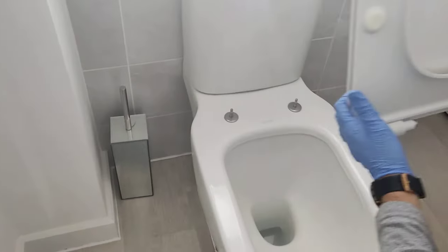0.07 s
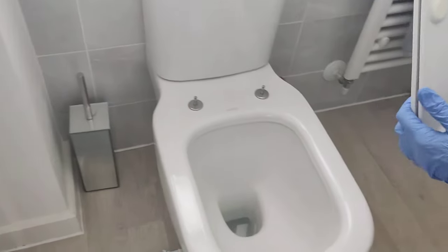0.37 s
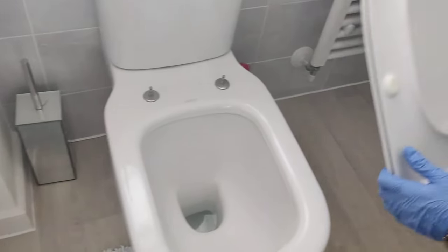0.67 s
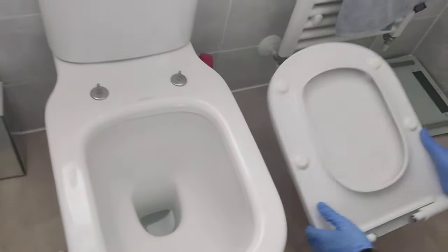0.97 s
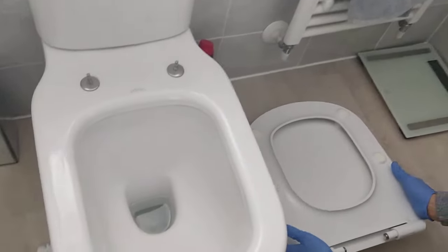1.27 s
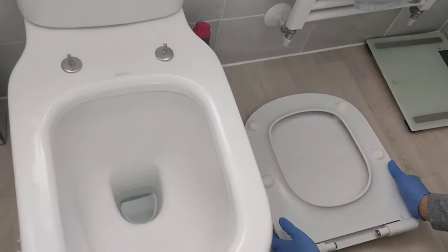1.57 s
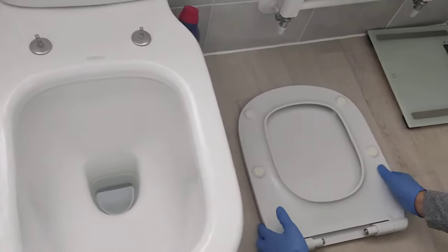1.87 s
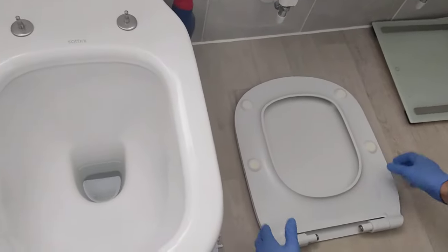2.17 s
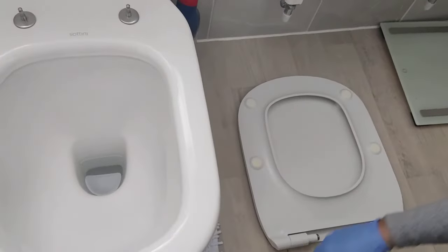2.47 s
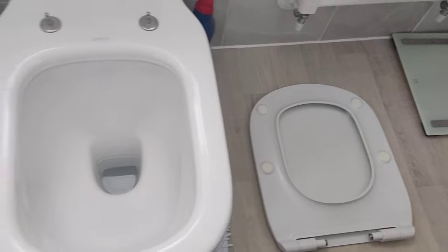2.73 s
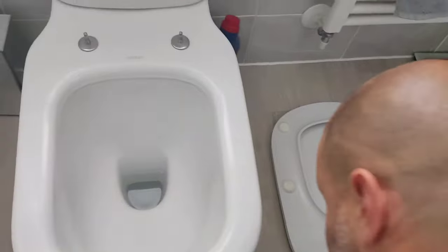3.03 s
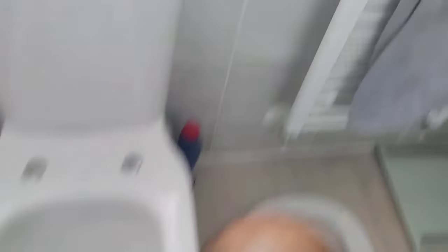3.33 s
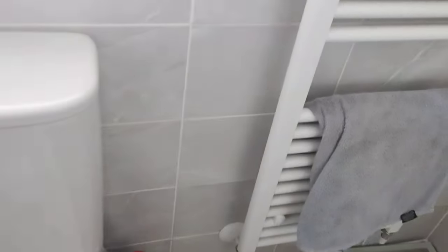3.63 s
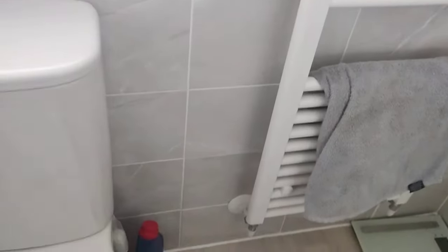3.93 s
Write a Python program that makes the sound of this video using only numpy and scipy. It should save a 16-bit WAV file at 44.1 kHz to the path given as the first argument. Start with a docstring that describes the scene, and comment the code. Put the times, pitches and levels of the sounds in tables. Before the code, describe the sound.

A plastic toilet seat is set down in a small tiled bathroom. Faint scuffs and sleeve rustle come first, with a low bump near 0.9 seconds. One edge knocks on the floor at 1.7; the rest clatters down at 2.1 and rocks lightly. Cloth swishes at 2.6. Around 3.4 seconds, something hard and hollow gives three loud, rapid clacks close by, then scrapes softly until about 3.9.

```python
"""Plastic seat on a tiled floor

A toilet seat is carried across a small bathroom amid rustling sleeves and handling noise. One edge
lands, then the rest clatters down and rocks. Something hard and hollow then clacks three times close by
and scrapes briefly. Each impact is a direct burst followed by reflections from the tiles; the struck
bodies ring in damped normal modes, and friction is amplitude-modulated noise."""
import sys
import numpy as np
from scipy import signal
from scipy.fft import rfft, irfft, next_fast_len
from scipy.io import wavfile
from scipy.ndimage import map_coordinates

SR = 44100
rng = np.random.default_rng(int(sys.argv[2]) if len(sys.argv) > 2 else 0)


def file_out(sig):
    """Save sig as 16-bit WAV at sys.argv[1]."""
    # one column per channel
    cols = np.atleast_2d(sig).T
    # limit, then scale
    lim = np.clip(cols, -1, 1)
    pcm = np.round(lim * 32767).astype(np.int16)
    wavfile.write(sys.argv[1], SR, pcm)


N = 176400
RING_N = SR * 3 // 4  # samples in the response to one impact

# likeness of the sound at the two microphone ports (frequency [Hz], correlation [-1 to 1])
PORT_CORRELATION = [(30, .8), (150, .96), (350, .82), (700, .45), (1400, -.1), (3000, 0)]
# spectrum of a dull thud (frequency [Hz], level [dB])
THUD_SPECTRUM = [(40, -44.5), (90, -21), (140, 2.5), (200, -3.5), (350, -7), (480, -13.5), (1500, -17.5),
                 (5000, -73)]
# spectrum of a sharp crack (frequency [Hz], level [dB])
CRACK_SPECTRUM = [(200, -13), (700, -22.5), (1750, -9), (2700, 0), (4500, -3), (5600, 1.5), (7500, 2),
                  (9000, 4), (11000, 2.5), (13000, -4.5), (14500, -25)]


def amp(db):
    """Amplitude ratio of a level in decibels."""
    return 10 ** (np.asarray(db) / 20)


def unit(x):
    """Normalisation to an rms of 1."""
    return x / np.sqrt(np.mean(x ** 2) + 1e-20)


def along(points, hz):
    """Interpolation of (frequency [Hz], value) points on a logarithmic frequency axis."""
    frequencies, values = np.transpose(points)
    return np.interp(np.log(hz + 1), np.log(frequencies + 1), values)


def add(track, s, sound):
    """Superposition of a sound on a track from time s."""
    part = track[:, round(s * SR):][:, :sound.shape[-1]]
    part += sound[..., :part.shape[-1]]


def wobble(rate):
    """Band-limited fluctuation: a spline through `rate` random knots a second."""
    knots = rng.standard_normal(int(N * rate / SR) + 4)
    return map_coordinates(knots, [np.arange(N) * rate / SR])


def swells(strokes):
    """Incoherent strokes (peak time [s], rise [s], fall [s], level [dB]) add in power to one envelope."""
    t = np.arange(N) / SR
    return np.sqrt(sum(amp(db) ** 2 * np.exp(-((t - s) / np.where(t < s, rise, fall)) ** 2)
                       for s, rise, fall, db in strokes))


def minimum_phase(gain, size):
    """Causality: folding the cepstrum onto positive time gives a gain curve its minimum phase."""
    cepstrum = irfft(np.log(gain), size)
    cepstrum[1:size // 2] *= 2
    cepstrum[size // 2 + 1:] = 0
    return np.exp(rfft(cepstrum))


def port_angle(hz):
    """Half the arccosine of the correlation: small in the bass, as long waves reach both ports alike."""
    return np.arccos(np.clip(along(PORT_CORRELATION, hz), -1, 1)) / 2


def coloured(pair, spectrum):
    """Spectral shaping at unit power gain; mid and side are weighted to set the ports' correlation."""
    size = 2 * next_fast_len(N * 5 // 8)
    hz = np.fft.rfftfreq(size, 1 / SR)
    response = minimum_phase(unit(amp(along(spectrum, hz))) + 1e-6, size)
    angle = port_angle(hz)
    mid, side = irfft(rfft(pair, size) * response * [np.cos(angle), np.sin(angle)])[:, :N]
    return np.array([mid + side, mid - side])


def noise(spectrum):
    """Stationary Gaussian noise of a given spectrum, in stereo."""
    return coloured(rng.standard_normal((2, N)), spectrum)


def burst(decay_s):
    """A transient: exponentially decaying noise of unit energy."""
    pulse = rng.standard_normal((2, RING_N)) * np.exp(-np.arange(RING_N) / SR / decay_s)
    return pulse / np.linalg.norm(pulse, axis=1, keepdims=True)


def early_reflections(tail, spread_db=4.5, merge_s=.025, arrivals_per_s=1500):
    """The first reflections arrive unevenly, then merge into a diffuse field; energy is conserved."""
    t = np.arange(RING_N) / SR
    arrivals = t * arrivals_per_s
    knots = rng.standard_normal(int(arrivals[-1]) + 2)
    flicker = np.interp(arrivals, np.arange(len(knots)), knots)
    uneven = tail * amp(spread_db * np.exp(-t / merge_s) * flicker)
    return uneven * np.linalg.norm(tail) / np.linalg.norm(uneven)


def impacts(blows, spectrum, direct_db, burst_s, build_s=0.0025):
    """Direct and reverberant sound: each blow (time [s], level [dB]) is a burst and its reflections."""
    # reverberation of the tiled room (frequency [Hz], t60 [s])
    reverberation = [(100, 0.47), (700, 0.35), (1840, 0.29), (4850, 0.29), (9000, 0.24)]
    track = np.zeros((2, N))
    build_up = 1 - np.exp(-np.arange(RING_N) / SR / build_s)
    for s, db in blows:
        hz, t, bands = signal.stft(rng.standard_normal((2, RING_N)), SR, nperseg=256)
        decay = amp(-60 * t / along(reverberation, hz)[:, None])
        diffuse = signal.istft(bands * decay, SR, nperseg=256)[1][:, :RING_N]
        tail = early_reflections(build_up * diffuse)
        direct = amp(direct_db) * np.linalg.norm(tail[0]) * burst(burst_s)
        add(track, s, amp(db) * (tail + direct))
    return coloured(track, spectrum)


def ringing(blows, modes, scatter_db, attack_s=0.0013):
    """Damped normal modes: each blow (time [s], level [dB]) adds energy that decays exponentially."""
    t = np.arange(RING_N) / SR
    hz, level, t60 = np.transpose(modes)[:, :, None]
    weight = amp(level) / np.linalg.norm(amp(level))
    envelope = weight * amp(-60 * t / t60) * (1 - np.exp(-t / attack_s))
    energy = np.zeros((len(modes), N))
    for s, db in blows:
        strength = amp(db + scatter_db * rng.standard_normal(hz.shape))
        add(energy, s, (envelope * strength) ** 2)
    phase = 2 * np.pi * (hz * np.arange(N) / SR + rng.random(hz.shape))
    lead = port_angle(hz) * rng.choice([-1, 1], hz.shape)  # high modes differ in phase at the ports
    return np.array([np.sum(np.sqrt(energy) * np.sin(phase + side * lead), axis=0) for side in (1, -1)])


def rippled(x, depth_db=3, spacing_hz=55):
    """Modal overlap: the crowded resonances of a plastic body ripple its treble spectrum."""
    size = next_fast_len(N + SR // 2)
    hz = np.fft.rfftfreq(size, 1 / SR)
    knots = rng.standard_normal(int(SR / spacing_hz))
    ripple_db = depth_db * map_coordinates(knots, [hz / spacing_hz]) * hz / (hz + 800)
    return irfft(rfft(x, size) * minimum_phase(amp(ripple_db), size), size)[:, :N]


def room_hiss(level_db=-59.5):
    """The noise floor: a quiet, stationary broadband hiss."""
    # spectrum of the hiss (frequency [Hz], level [dB])
    hiss_spectrum = [(30, -19), (130, -4.5), (400, -9), (1000, -12), (3000, -12), (7500, -16.5), (8700, -8),
                     (11000, -13.5), (14200, -17)]
    return amp(level_db) * noise(hiss_spectrum)


def jostling():
    """Structure-borne sound: dry taps and a low rumble as the microphone's housing is jostled."""
    # taps on the housing (time [s], relative level [dB])
    taps = [(0.272, -53), (0.426, -60), (0.607, -56.5), (1.005, -45), (1.184, -56.5), (1.396, -53),
            (3.245, -50.5), (3.296, -57)]
    # spectrum of a tap (frequency [Hz], level [dB])
    tap_spectrum = [(40, -10), (130, 9.5), (320, 2), (600, -9.5), (1300, -11.5), (12000, -45)]
    # course of the rumble (time [s], level [dB])
    rumble_levels = [(0.0, -48.5), (0.72, -59.5), (0.88, -40), (1.22, -55.5), (2.08, -52), (2.94, -58.5),
                     (2.99, -43.5), (3.19, -53), (4.0, -53.5)]
    # spectrum of the rumble (frequency [Hz], level [dB])
    rumble_spectrum = [(15, 6.5), (70, -8.5), (300, -27), (1000, -74)]
    mid_impulse = np.array([[1], [0]]) * (np.arange(RING_N) == 0)
    pulses = np.zeros((2, N))
    for s, db in taps:
        add(pulses, s, amp(db + 27) * (mid_impulse + 0.83 * burst(0.0016)))
    rumble_envelope = amp(np.interp(np.arange(N) / SR, *np.transpose(rumble_levels)))
    return coloured(pulses, tap_spectrum) + rumble_envelope * noise(rumble_spectrum)


def ribbed_sleeve(peak_s=2.64, swell_s=0.038, level_db=-58):
    """Friction over ribs gives a band of noise whose pitch rises as the arm speeds up."""
    centre_hz, rise_hz_per_s, width_hz = 1610, 9000, 580
    t = np.arange(N) / SR - peak_s
    phase = 2 * np.pi * np.cumsum(centre_hz + rise_hz_per_s * t) / SR
    ribs = [unit(wobble(width_hz) * np.sin(phase) + wobble(width_hz) * np.cos(phase)) for _ in range(2)]
    return swells([(peak_s, swell_s, swell_s, level_db)]) * np.array(ribs)


def cloth():
    """Friction noise: sleeves and gloves rub in finely grained swishes."""
    # strokes of cloth (peak time [s], rise [s], fall [s], level [dB])
    swishes = [(.26, 0.033, 0.051, -55), (.71, 0.073, 0.085, -58), (.832, 0.005, 0.051, -45),
               (1.06, 0.077, 0.075, -54.5), (1.29, .07, 0.12, -51), (1.89, 0.032, 0.11, -54),
               (2.063, 0.032, 0.06, -45), (2.63, 0.044, 0.071, -43.5), (2.95, 0.17, 0.11, -49),
               (3.35, 0.082, 0.14, -53)]
    # spectrum of rubbing cloth (frequency [Hz], level [dB])
    cloth_spectrum = [(200, -22), (700, -19), (5000, -9), (7500, -6.5), (8700, -1), (10000, -2),
                      (12000, -8.5), (14200, -9.5)]
    grain = amp(0.84 * wobble(220))
    return swells(swishes) * grain * noise(cloth_spectrum)


def handling():
    """Weak impulsive excitation: scuffs of the carried seat, small dry clicks and soft low bumps."""
    # shifts of the seat (time [s], scuff level [dB], ring level [dB])
    shifts = np.array([(0.109, -51.5, -48), (.627, -50, -62), (.649, -53, -66), (0.711, -56, -65),
                       (.861, -45, -72)])
    # spectrum of a scuff (frequency [Hz], level [dB])
    scuff_spectrum = [(330, 2.5), (550, -2.5), (900, -0.5), (1750, -2.5), (2400, -6), (3500, -17),
                      (12000, -44)]
    # hollow ring after a scuff (frequency [Hz], level [dB], t60 [s])
    scuff_modes = [(1281, -2, .08), (1696, 0, .16), (1890, -2, .16), (2288, -7, .13)]
    # small dry clicks (time [s], level [dB])
    clicks = [(.108, -57), (.339, -54.5), (.447, -57.5), (3.980, -51.5)]
    # soft low bumps (time [s], level [dB])
    bumps = [(.860, -33), (.885, -27), (.975, -40), (2.99, -47)]
    # low modes that a bump excites (frequency [Hz], level [dB], t60 [s])
    bump_modes = [(64, -10, .4), (110, -3, .3), (146, 0, .27), (190, -1, .2)]
    return (impacts(shifts[:, [0, 1]], scuff_spectrum, direct_db=-5.5, burst_s=0.0016)
            + ringing(shifts[:, [0, 2]], scuff_modes, scatter_db=1)
            + impacts(clicks, CRACK_SPECTRUM, direct_db=-0.5, burst_s=0.0018)
            + ringing(bumps, bump_modes, scatter_db=4.5))


def scrape():
    """Sliding friction: short strokes give a fluctuating hiss and a low judder."""
    # strokes (peak time [s], rise [s], fall [s], hiss level [dB], judder level [dB])
    strokes = np.array([(3.33, 0.022, 0.17, -57.5, -62), (3.638, 0.052, 0.026, -48.5, -49),
                        (3.77, 0.064, 0.076, -48, -45.5), (3.853, 0.025, 0.038, -42, -74)])
    # spectrum of the hiss (frequency [Hz], level [dB])
    hiss_spectrum = [(1200, 0.5), (2500, 4.5), (5000, 2), (7500, 2), (8800, 4), (11000, 2.5), (14000, -10)]
    # spectrum of the judder (frequency [Hz], level [dB])
    judder_spectrum = [(80, -19), (180, -9), (235, 2.5), (300, -9.5), (370, -11), (600, -9.5), (850, -24),
                       (1400, -15), (4000, -31.5)]
    hiss = swells(strokes[:, :4]) * amp(1.7 * wobble(240)) * noise(hiss_spectrum)
    judder = swells(strokes[:, [0, 1, 2, 4]]) * amp(1.7 * wobble(70)) * noise(judder_spectrum)
    return hiss + judder


def clacks():
    """Shell resonance: sharp cracks close by build to a snap that knocks and booms in a hollow body."""
    # contacts (time [s], crack level [dB], knock level [dB], boom level [dB])
    contacts = np.array([(3.39, -36.5, -39, -44.5), (3.392, -23.5, -36, -45), (3.4249, -20.5, -34, -36),
                         (3.435, -34, -46, -44), (3.450, -28, -28, -29), (3.4724, -16, -25, -34),
                         (3.479, -31, -22, -28.5)])
    # spectrum of a knock (frequency [Hz], level [dB])
    knock_spectrum = [(700, -20.5), (1200, -7), (1750, -4.5), (2200, 5), (3500, -4), (6000, -19)]
    # low modes of the shell (frequency [Hz], level [dB], t60 [s])
    boom_modes = [(184, -4, .3), (222, 0, .33), (247, -7, .35)]
    # middle modes of the shell (frequency [Hz], level [dB], t60 [s])
    knock_modes = [(2131, 1, .28), (2170, -1, .22), (2480, -2, .25), (2522, 0, .28), (2602, 0, .28),
                   (2885, 5, .1)]
    # highest modes of the shell (frequency [Hz], level [dB], t60 [s])
    bright_modes = [(9132, 0, .24), (9489, -1, .24), (10857, 0, .22)]
    cracks, knocks, booms = (contacts[:, [0, column]] for column in (1, 2, 3))
    ring = amp(2) * ringing(booms, boom_modes, scatter_db=1)
    ring += amp(-1) * ringing(knocks, knock_modes, scatter_db=1)
    snap = rippled(impacts(cracks, CRACK_SPECTRUM, direct_db=-2, burst_s=0.0018)
                   + impacts(knocks, knock_spectrum, direct_db=-3.5, burst_s=0.0045))
    ring += amp(-7.5) * ringing(cracks, bright_modes, scatter_db=7)
    thud = amp(-6) * impacts(booms, THUD_SPECTRUM, direct_db=-22, burst_s=0.0034)
    return snap + ring + thud


def seat(let_go_s=2):
    """Impact excitation: seat and lid strike the floor and each other; harder contacts are brighter.
    Boundary conditions set the modes, which differ between the gripped seat and the one lying flat."""
    # contacts (time [s], clatter level [dB], thud level [dB], tick level [dB])
    contacts = np.array([(1.671, -33.5, -36.5, -35.5), (1.676, -32, -38.5, -36), (1.689, -33.5, -42, -48),
                         (1.717, -46, -39.5, -68), (1.9, -43, -56.5, -73), (2.083, -52, -25.5, -31.5),
                         (2.092, -27, -27.5, -29), (2.106, -23.5, -45, -37), (2.121, -26, -24.5, -36),
                         (2.14, -27, -33, -28.5), (2.223, -45, -67, -43), (2.281, -47, -46, -59),
                         (2.316, -39.5, -44.5, -50.5), (2.408, -50, -56, -55.5), (2.486, -51.5, -51.5, -56)])
    # spectrum of the clatter (frequency [Hz], level [dB])
    clatter_spectrum = [(100, -18.5), (330, 1.5), (450, -9.5), (550, -0.5), (750, -6), (1000, -6),
                        (1300, -4.5), (2000, 0.5), (3200, 2.5), (3800, -10), (6000, -17.5), (7000, -27),
                        (14000, -31)]
    # spectrum of the upper clatter of hard contacts (frequency [Hz], level [dB])
    treble_spectrum = [(2500, -41), (3700, 1), (5100, 1), (6100, -1.5), (6800, -17), (9500, -16),
                       (14000, -46)]
    # spectrum of a tick of hard plastic (frequency [Hz], level [dB])
    tick_spectrum = [(500, -36), (3000, 11.5), (7000, 6), (8800, 9), (11000, 3), (14000, -9)]
    # modes of the seat gripped and resting on one edge (frequency [Hz], level [dB], t60 [s])
    held_modes = [(113, -3, .45), (205, 0, .33), (335, 1, .22), (378, 1, .22), (560, 0, .2),
                  (1663, -2, .24), (3079, -3, .33)]
    # low modes of the released seat and lid (frequency [Hz], level [dB], t60 [s])
    low_modes = [(145, 0, .37), (177, -2, .33), (262, -12, .33), (286, -9, .35), (378, -16, .36)]
    # high modes of the released seat and lid (frequency [Hz], level [dB], t60 [s])
    high_modes = [(578, -2, .45), (604, -1, .38), (926, 4, .29), (979, 0, .33), (1630, -5, .6),
                  (2075, -6, .5), (2440, -5, .3), (2980, -1, .45), (3075, -2, .48), (3408, -2, .45),
                  (4334, 0, .26), (4530, -1, .26), (4997, -1, .26)]
    clatters, thuds, ticks = (contacts[:, [0, column]] for column in (1, 2, 3))
    held = contacts[:, 0] < let_go_s
    hardest_db = clatters[:, 1].max()
    # the treble loses an extra 0.45 dB for each dB below the hardest contact
    trebles = [(s, db - 0.5 + 0.45 * (db - hardest_db)) for s, db in clatters]
    plastic = (impacts(clatters, clatter_spectrum, direct_db=-13, burst_s=0.0015)
               + impacts(trebles, treble_spectrum, direct_db=-6, burst_s=0.0027)
               + impacts(ticks, tick_spectrum, direct_db=-6, burst_s=0.0044))
    ring = (amp(2) * ringing(thuds[held], held_modes, scatter_db=1)
            + amp(-0.5) * ringing(thuds[~held], low_modes, scatter_db=1)
            + amp(-5.5) * ringing(clatters[~held], high_modes, scatter_db=2))
    return rippled(plastic) + ring + amp(-8) * impacts(thuds, THUD_SPECTRUM, direct_db=-2, burst_s=0.006)


def scene():
    """Linear superposition of all sources and the hiss of the room."""
    return seat() + clacks() + scrape() + jostling() + handling() + ribbed_sleeve() + cloth() + room_hiss()


def record(dry):
    """Transduction: the two ports resonate differently, peaks saturate softly and the band is limited."""
    # excess of the left port over the right (frequency [Hz], level difference [dB])
    balance = [(700, 2), (1300, 0.5), (4500, 1), (6500, -2), (7800, -5.5), (8700, -13.5), (9800, -2.5),
               (11000, 5.5), (12500, 3.5), (14000, 6.5)]
    peak_limit, cutoff_hz = .8, 14350
    size = next_fast_len(N + SR // 2)
    hz = np.fft.rfftfreq(size, 1 / SR)
    port_gains = amp(along(balance, hz) * np.array([[.5], [-.5]]))
    heard = irfft(rfft(dry, size) * port_gains, size)
    rounded = heard / (1 + (heard / peak_limit) ** 4) ** .25
    low_pass = 1 / np.sqrt(1 + (hz / cutoff_hz) ** 200)
    return irfft(rfft(rounded) * low_pass, size)[:, :N]


dry = scene()
out = record(dry)
file_out(out)
```